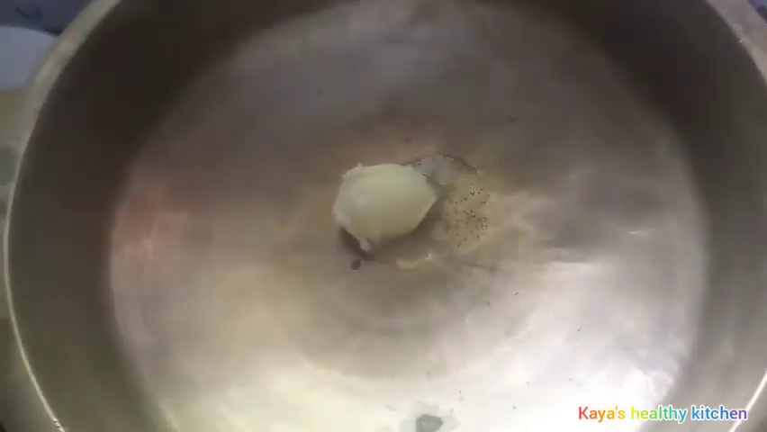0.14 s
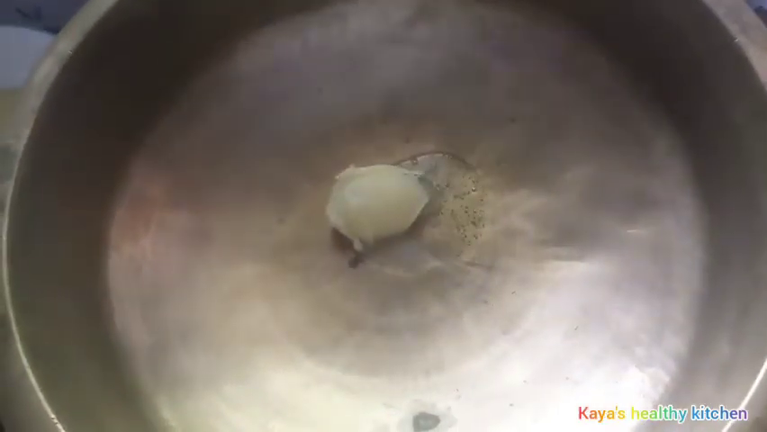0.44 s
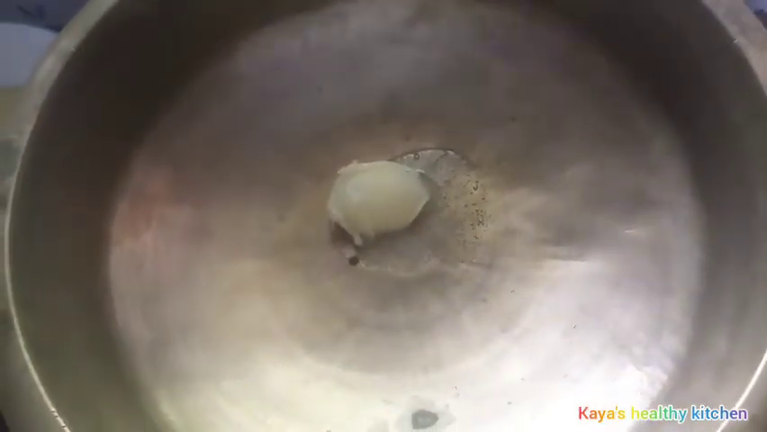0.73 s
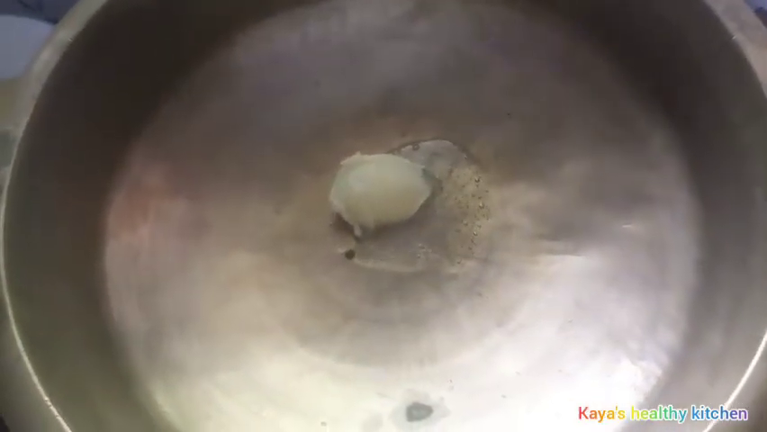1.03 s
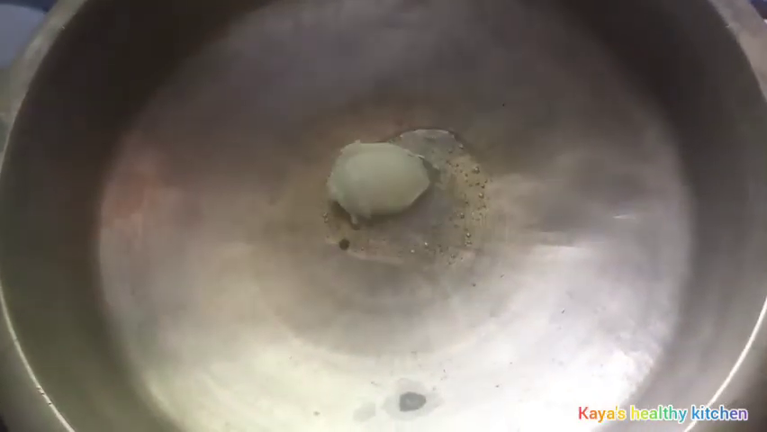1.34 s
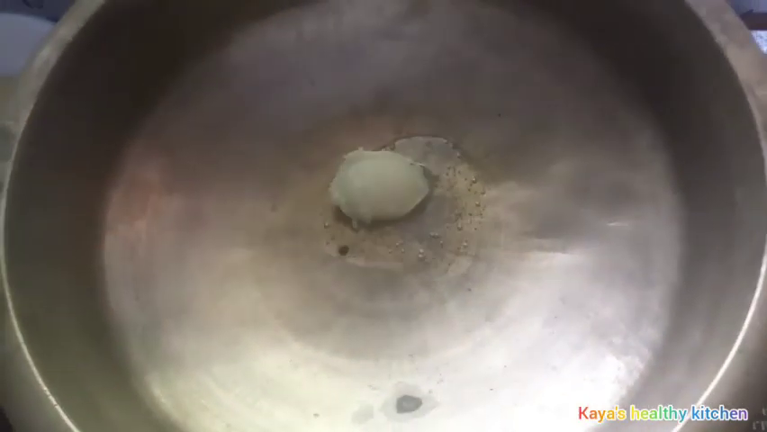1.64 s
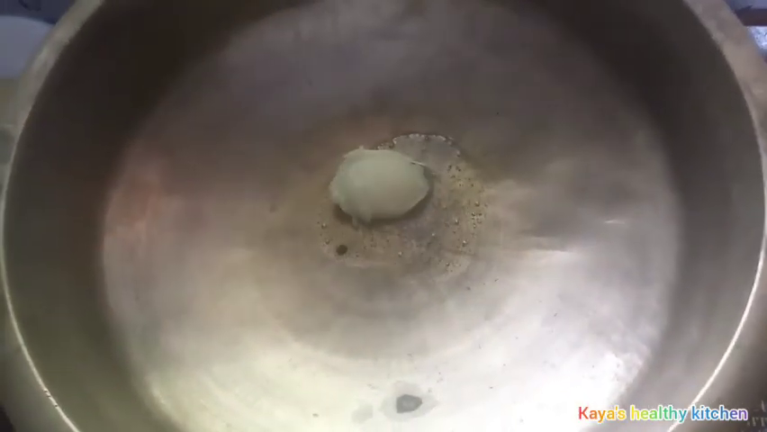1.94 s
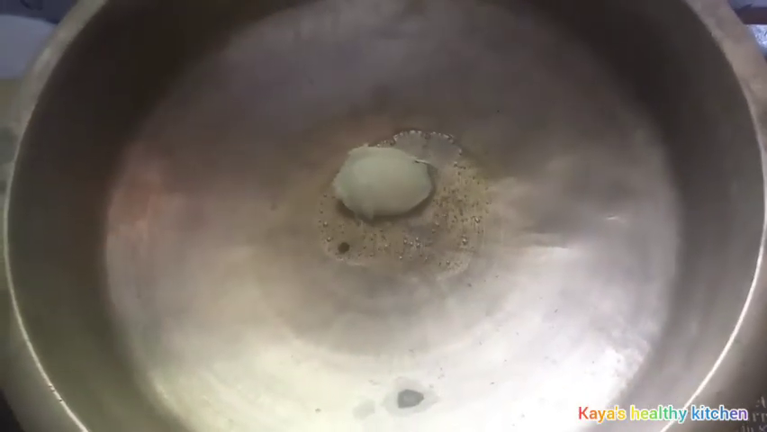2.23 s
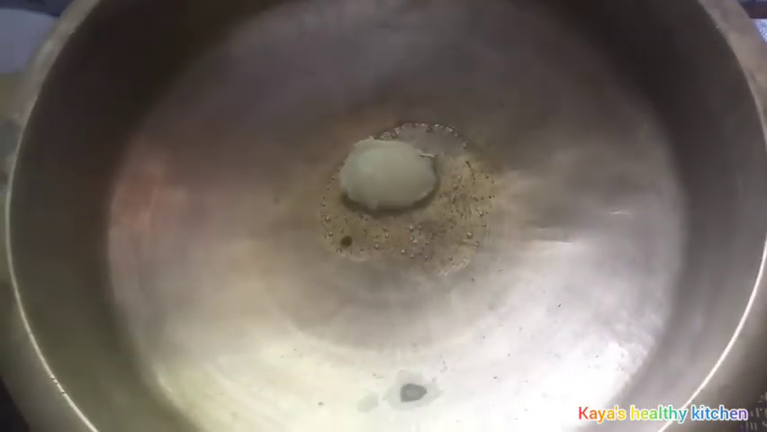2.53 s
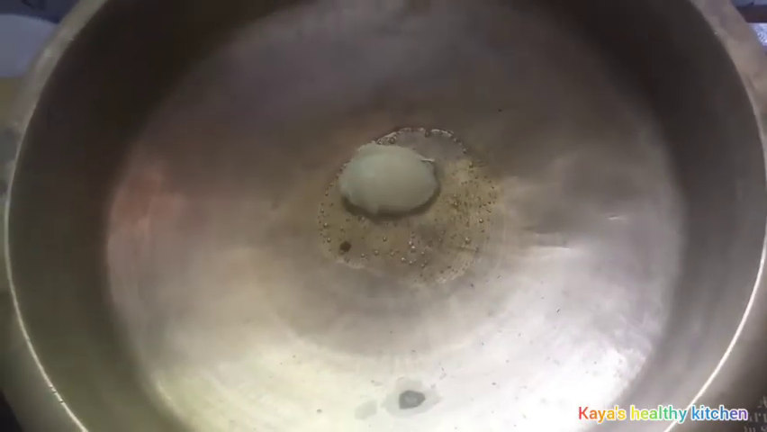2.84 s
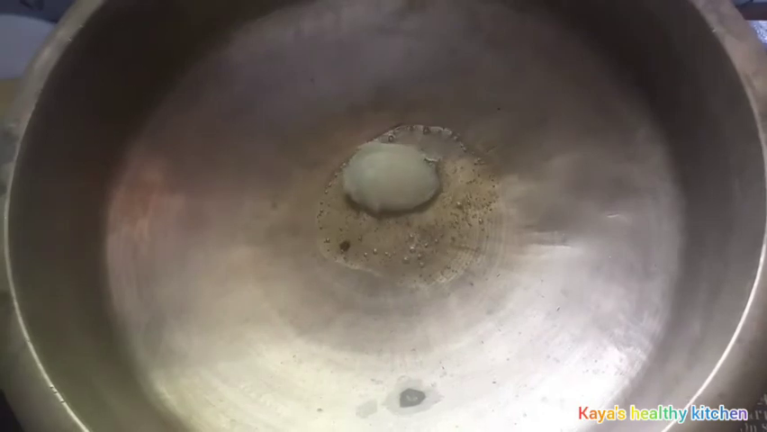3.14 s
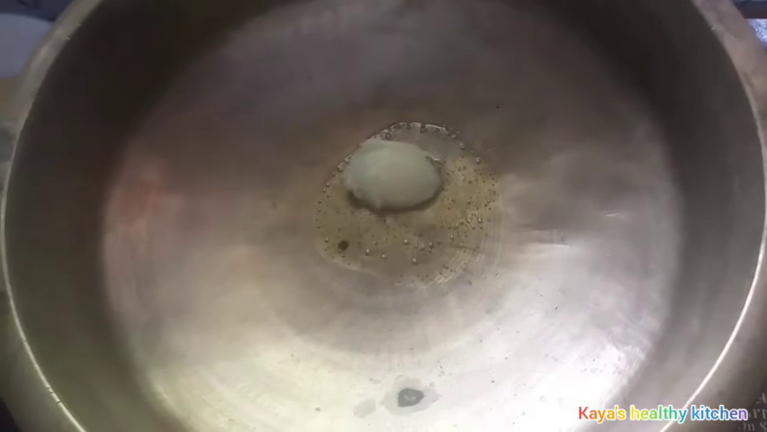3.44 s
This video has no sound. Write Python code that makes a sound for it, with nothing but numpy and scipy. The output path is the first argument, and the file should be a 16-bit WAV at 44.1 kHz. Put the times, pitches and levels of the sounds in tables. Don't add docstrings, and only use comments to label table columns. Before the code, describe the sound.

Butter sizzles in a hot steel pan, close and mono. From 0 to 1.5 seconds a dense bright fizz carries rapid, loud, sharp cracks with short metallic ringing. From 1.6 to 2.1 the sizzle thins and pops separate. Afterwards only faint ticks, spits and small puffs remain, with a few clearer pops near 3.3 and 3.5, over quiet low kitchen tone and faint hiss.

```python
import sys
import numpy as np
from scipy import signal
from scipy.fft import rfft, irfft
from scipy.io import wavfile

SR = 44100
rng = np.random.default_rng(int(sys.argv[2]) if len(sys.argv) > 2 else 0)


def master(y):
    cut = np.clip(np.atleast_2d(y).T, -1, 1)
    pcm = np.round(cut * 32767)
    wavfile.write(sys.argv[1], SR, pcm.astype(np.int16))


def ratio_of_db(decibels):
    return 10 ** (np.asarray(decibels, float) / 20)


N = 158760
TREBLE_HZ = 10500
CRACK_HZ = 4164
POP_LAG_S = 0.001021
BURST_LEN = 1024


def rms_one(x):
    return x / np.sqrt(np.mean(x ** 2) + 1e-20)


def drift(rate):
    r = np.exp(-80 * np.pi * rate / SR)
    slow = signal.lfilter([1], [1, -2 * r, r * r], rng.standard_normal(N // 40 + 2002))[2000:]
    return np.interp(np.arange(N) / 40, np.arange(len(slow)), rms_one(slow))


def ring(clicks, hz, t60):
    r = ratio_of_db(-60 / (t60 * SR))
    w = 2 * np.pi * min(hz, .45 * SR) / SR
    return signal.lfilter([0, np.sin(w)], [1, -2 * r * np.cos(w), r * r], clicks + 1e-18)


def colour(x, points):
    below = (points[0][0] / 4, points[0][1] - 25)
    above = (points[-1][0] * 3, points[-1][1] - 40)
    hz, db = np.transpose([below] + list(points) + [above])
    log_hz = np.log(np.arange(2049) * SR / 4096 + 1)
    ceps = irfft(np.interp(log_hz, np.log(hz), db) * np.log(10) / 20)
    ceps[1:2048] *= 2
    impulse = irfft(np.exp(rfft(ceps[:2049], 4096)))
    return signal.fftconvolve(x, impulse)[:len(x)]


def bubbles(vigour_db, per_s, spread_db, cycles, clump_db, low_hz, high_hz, points):
    rate_share = .4
    sag, sag_from_s, sag_to_s = 0.99, 0.59, 1.6
    swing = rate_share * (vigour_db - vigour_db.max())
    draw = rng.random((3, N))
    excess = np.minimum(-np.log(draw[0] + 1e-9), 2.8)
    sizes = ratio_of_db(spread_db * excess) * rng.choice([-1, 1], N)
    chance = per_s * ratio_of_db(swing + clump_db * (drift(7) + drift(25))) / SR
    born = sizes * (draw[1] < chance)
    group = (draw[2] * 16).astype(int)
    rings = np.zeros(N)
    for k, hz in enumerate(np.geomspace(low_hz, high_hz, 16)):
        rings += ring(born * (group == k), hz, cycles / hz) * hz ** .5
    late = np.clip((np.arange(N) / SR - sag_from_s) / (sag_to_s - sag_from_s), 0, 1)
    sunk = [(hz * sag, db) for hz, db in points]
    toned = (1 - late) * colour(rings, points) + late * colour(rings, sunk)
    return ratio_of_db(vigour_db) * rms_one(toned * ratio_of_db(-swing / 2))


def large_bubbles(big_db):
    # frequency in Hz, density in dB per Hz.
    big_colour = [(1800, -18), (2600, -6.5), (3300, -7.5), (3700, 1.5), (4200, 5), (4700, 0.5), (5100, -12)]
    return ratio_of_db(-2.5) * bubbles(big_db, per_s=700, spread_db=3, cycles=5.6, clump_db=1,
                               low_hz=1460, high_hz=7000, points=big_colour)


def fine_fizz(fizz_db):
    # frequency in Hz, density in dB per Hz.
    fizz_colour = [(2650, -16.5), (4500, -14.5), (4990, -7), (5960, -4.5), (6850, -7.5), (8600, -4.5),
                   (9850, -18), (11300, -13.5), (12800, -20), (14300, -15.5), (15600, -19)]
    dulls_below_db, dulls_db = -31, -2.5
    fizz = ratio_of_db(-0.5) * bubbles(fizz_db, per_s=1300, spread_db=4.5, cycles=3.7, clump_db=1,
                               low_hz=6000, high_hz=11900, points=fizz_colour)
    treble = signal.sosfiltfilt(signal.butter(4, TREBLE_HZ, "high", fs=SR, output="sos"), fizz)
    loss_db = dulls_db * np.clip((dulls_below_db - fizz_db) / 10, 0, 2)
    return fizz - treble * (1 - ratio_of_db(loss_db))


def short_burst(hz, cycles):
    unit = np.eye(1, BURST_LEN)[0]
    first, second = cycles
    burst = ring(ring(unit, hz, first / hz), hz, second / hz)
    return burst / np.abs(burst).max()


def film_crack():
    return short_burst(CRACK_HZ, (4.44, 4.44))


def pops():
    # start in seconds, peak in dB, pitch in Hz.
    early_pops = [(0.118, -7, 4100), (0.154, -0.5, 3830), (0.186, -2.5, 3940), (0.2265, -1, 4120),
                  (0.2593, -5.5, 4350), (0.3164, -29, 4330), (0.387, -12, 4400), (0.4627, -2.5, 4000),
                  (0.6187, -3.5, 4130), (0.645, -5, 4250), (0.6981, 0.5, 4270), (0.7199, -0.5, 3770),
                  (0.7697, -7.5, 4320), (0.8134, -1.5, 4200), (0.8402, -2, 4200), (0.9302, -4, 4150),
                  (0.9446, -1, 4060), (0.988, -8.5, 3900), (1.0133, 2, 4330), (1.1413, -9, 3700),
                  (1.1564, -3, 3830), (1.2126, -2.5, 4130), (1.2218, -7, 3900), (1.2468, -9, 4160),
                  (1.2985, -3, 3940), (1.3265, -3, 3700), (1.3812, -4.5, 3850), (1.3922, -4, 4350),
                  (1.4153, -13, 3800), (1.4481, -4.5, 3870), (1.4618, -5.5, 4070), (1.504, -6, 3620),
                  (1.5252, -6.5, 4480), (1.55, -3, 3850)]
    # start in seconds, peak in dB, pitch in Hz,
    # tail in dB.
    lone_pops = [(1.6211, -2, 3970, -0.5), (1.6939, 0, 3840, -21), (1.73, -10.5, 4100, 1),
                 (1.7622, -8, 4680, 2.5), (1.7854, -3, 4180, -1), (1.918, -3.5, 4600, -8),
                 (1.977, -20, 7200, 6), (2.0023, -16, 6600, 9), (2.012, -7.5, 4360, -1.5),
                 (2.0849, -20, 4760, 8.5), (2.1223, -12.5, 4660, 4.5), (2.2386, -22, 6340, -3),
                 (2.2494, -21.5, 7140, -16), (2.2819, -18, 4660, 5), (2.308, -22, 5840, 2),
                 (2.3506, -16.5, 5240, -0.5), (2.4064, -23.5, 4980, 8), (2.5202, -16, 3670, -14),
                 (2.5455, -22, 4600, -32),
                 (2.6484, -19, 5030, 3), (2.664, -28, 4860, -6), (2.7219, -23, 5660, 5),
                 (2.7833, -20, 5800, -4), (2.8256, -24.5, 6170, -6), (2.8522, -17.5, 4570, 0.7),
                 (2.864, -31, 8100, 1.7), (2.8758, -28, 7900, 1.7), (2.9528, -34, 7200, 8),
                 (2.9872, -25, 6900, 1.2), (3.018, -36, 8200, -1), (3.0615, -28, 7000, 4.5),
                 (3.2032, -35.5, 5860, 11), (3.2384, -34.5, 5600, 1.5), (3.3369, -13, 5320, 1.3),
                 (3.3702, -19, 5030, 1), (3.5248, -17.5, 4700, -5.8)]
    early_tail_db, pop_db, wet_db, ring_db, ring_cycles = 3.5, 0.5, -3.5, -12, 38
    dry, send = np.zeros(N + BURST_LEN), np.zeros(N + BURST_LEN)
    unit = np.eye(1, BURST_LEN)[0]
    crack = film_crack()
    for s, db, hz, tail_db in [row + (early_tail_db,) for row in early_pops] + lone_pops:
        bubble = ring(unit, hz, ring_cycles / hz)
        i = int((s + POP_LAG_S) * SR)
        part = slice(i, i + BURST_LEN)
        lift = np.clip(hz / CRACK_HZ, .5, 2) ** 2
        dry[part] += ratio_of_db(db + pop_db) * (crack + ratio_of_db(ring_db) * np.roll(bubble, 4) * lift)
        send[part] += ratio_of_db(db + pop_db + wet_db + tail_db) * (bubble + 0.1 * crack)
    return dry[:N], send[:N]


def spits_and_puffs():
    # start in seconds, peak in dB, pitch in Hz.
    spits = [(1.7742, -21, 13900), (1.824, -25, 11700), (2.0126, -31, 11400), (2.0745, -35, 11300),
             (2.1902, -38, 14500), (2.248, -29, 11400), (2.352, -30, 11500), (2.3638, -27, 14500),
             (2.4985, -39, 10600), (2.52, -26, 11300), (2.5574, -36, 11400), (2.6237, -31.5, 11300),
             (2.6492, -36, 14300), (2.7165, -30, 11200), (2.7529, -43, 10500), (2.7819, -42, 11200),
             (2.8532, -45, 10650), (3.0193, -49, 10600), (3.0602, -43, 11100), (3.1061, -41, 15000),
             (3.2396, -27.5, 11600), (3.3187, -31, 14200), (3.37, -30.5, 11600), (3.482, -39, 11400),
             (3.5796, -41, 14300)]
    # start in seconds, peak in dB, pitch in Hz, tail in dB.
    puffs = [(1.9323, -16.5, 7300, -1), (2.1842, -21, 6100, -5), (2.2391, -20.5, 6500, 3),
             (2.3039, -25, 5950, 0), (2.3164, -22, 8010, 2), (2.3523, -22.5, 6800, -7),
             (2.4341, -24, 6560, 1), (2.5209, -26.5, 8300, -2), (2.5514, -27, 6530, -3.5),
             (2.5628, -27.5, 8000, 0), (2.5883, -23.5, 8150, 1), (2.6476, -32, 7410, 4),
             (2.7, -37, 7660, 5), (2.7215, -30.5, 7700, 3.5), (2.7514, -26, 8650, -2),
             (2.7823, -28.5, 6260, 1), (2.8267, -25.5, 5840, -2), (2.8532, -21, 6900, -3),
             (2.8766, -19, 7960, -2.5), (2.9529, -27.5, 7200, -11), (2.9884, -25, 7500, -15),
             (3.0198, -24.5, 8200, -3), (3.0667, -24.5, 7340, 0), (3.2029, -27.5, 5800, -7),
             (3.3376, -24, 5940, -7), (3.371, -27.5, 7600, -4), (3.4807, -33.5, 9500, 3),
             (3.5047, -33.5, 7760, 0), (3.5825, -27, 8200, 2)]
    spit_db, spit_cycles, spit_wet_db = -1, 17, -7
    puff_db, puff_cycles, puff_wet_db = 1.9, 18, 2
    bursts = [(s, db + spit_db, hz, spit_wet_db, spit_cycles) for s, db, hz in spits]
    bursts += [(s, db + puff_db, hz, tail_db + puff_wet_db, puff_cycles) for s, db, hz, tail_db in puffs]
    dry, send = np.zeros(N + BURST_LEN), np.zeros(N + BURST_LEN)
    for s, db, hz, tail_db, cycles in bursts:
        i = int((s + POP_LAG_S) * SR)
        burst = ratio_of_db(db) * short_burst(hz, (cycles, cycles / 2))
        dry[i:i + BURST_LEN] += burst
        send[i:i + BURST_LEN] += ratio_of_db(tail_db) * burst
    return dry[:N], send[:N]


def crackle(big_db):
    # start in seconds, peak in dB.
    ticks = [(2.208, -28), (2.2124, -25), (2.221, -29), (2.2536, -13), (2.2743, -16), (2.3154, -22),
             (2.3296, -18), (2.3644, -18), (2.38, -22), (2.4218, -15), (2.4336, -17), (2.4442, -31),
             (2.452, -21), (2.5514, -23), (2.7173, -27), (2.7275, -16), (2.9004, -26), (3.0666, -16.5),
             (3.4814, -29)]
    per_s, crackle_db, end_s, tick_db = 70, 13, 2.2, -6.5
    small = (rng.random(N) < per_s / SR) * ratio_of_db(big_db + crackle_db + 2.0 * rng.standard_normal(N))
    small = small * (np.arange(N) / SR < end_s)
    for s, db in ticks:
        small[int((s + POP_LAG_S) * SR)] = ratio_of_db(db + tick_db)
    return signal.fftconvolve(small, film_crack())[:N]


def single_bursts(big_db):
    # frequency in Hz, gain in dB.
    mic_colour = [(2000, 1), (5000, 0), (9000, -4), (10000, -14), (15500, -20)]
    pop_dry, pop_send = pops()
    spit_dry, spit_send = spits_and_puffs()
    dry = colour(pop_dry + crackle(big_db), mic_colour) + spit_dry
    return dry, colour(pop_send, mic_colour) + spit_send


def pan_body(big_db, dry):
    # frequency in Hz, density in dB per Hz.
    body_colour = [(500, -14), (620, -1), (800, -7.5), (1000, -5), (1040, -16), (1120, 1), (1330, 0),
                   (1440, 5), (1550, -0.5), (1750, -2.5)]
    body_db, follows, fade_db_per_s, thud_db = -26, 0.6, 4, -25
    peak_db = big_db.max()
    swell_db = body_db + peak_db + follows * (big_db - peak_db)
    swell_db = swell_db - fade_db_per_s * np.arange(N) / SR + 2.0 * drift(30)
    body = ratio_of_db(swell_db) * rms_one(colour(rng.standard_normal(N), body_colour))
    return body + ratio_of_db(thud_db) * colour(np.abs(dry), body_colour)


def echoed(x):
    # delay in seconds, level in dB.
    echoes = [
        (.0019, -5),
        (.0042, -14),
    ]
    thin = signal.sosfilt(signal.butter(2, 3600, "high", fs=SR, output="sos"), x)
    return x + sum(ratio_of_db(db) * np.pad(thin, (int(s * SR), 0))[:len(x)] for s, db in echoes)


def space(pan_db):
    # frequency in Hz, level in dB, t60 in seconds.
    pan_modes = [(2350, -10, .3), (3600, -6, .2), (4140, -5, .2), (4770, -1, .7), (5110, 1, .35),
                 (5400, -3, .3), (5760, -2, .3), (7550, -3, .3), (8400, 0, .35), (10450, -3, .7)]
    kitchen_t60_s, treble_t60_s, rise_s = 0.26, 0.2, 0.0037
    t = np.arange(SR // 2) / SR
    noise = rng.standard_normal(len(t))
    low = signal.sosfiltfilt(signal.butter(2, TREBLE_HZ, fs=SR, output="sos"), noise)
    tail = low * ratio_of_db(-60 * t / kitchen_t60_s) + (noise - low) * ratio_of_db(-60 * t / treble_t60_s)
    tail = rms_one(tail * (1 - np.exp(-t / rise_s)))
    steel = sum(ratio_of_db(db - 60 * t / t60) * np.sin(2 * np.pi * hz * t) for hz, db, t60 in pan_modes)
    return rms_one(tail + ratio_of_db(pan_db) * rms_one(steel)) / np.sqrt(len(t))


def pan_and_kitchen(big, fizz, send):
    wall_s, wall_db = .0165, -9
    spread = ratio_of_db(-4.5) * big + ratio_of_db(-1) * fizz
    wet = np.zeros(N)
    for path in range(4):
        wet += 0.98 * signal.fftconvolve(spread * np.tanh(drift(20.7)), space(pan_db=-15))[:N]
    wet += signal.fftconvolve(send, space(pan_db=-10))[:N]
    return wet + ratio_of_db(wall_db) * np.pad(send, (int(wall_s * SR), 0))[:N]


def room_tone():
    # frequency in Hz, density in dB per Hz.
    room_colour = [(25, -28), (65, -5), (115, -5.5), (230, -17), (1100, -42), (1400, -7), (2000, -15)]
    # time in seconds, level in dB.
    rumble = [
        (0, -56),
        (1.1, -66.5),
        (1.5, -65.5),
        (3.05, -65),
        (3.4, -59),
    ]
    rumble_db = np.interp(np.arange(N) / SR, *np.transpose(rumble)) + drift(10)
    return ratio_of_db(rumble_db) * rms_one(colour(rng.standard_normal(N), room_colour))


def far_hiss():
    hiss_hz, t60_s, hiss_db = 2534, 0.0047, -58.5
    hiss = ring(ring(rng.standard_normal(N), hiss_hz, t60_s), hiss_hz, t60_s)
    return rms_one(hiss) * ratio_of_db(hiss_db + 2.0 * drift(9))


def far_hum():
    # centre in seconds, length in seconds, level in dB.
    swells = [
        (2.71, 0.042, -72),
        (2.905, 0.065, -72),
        (3.06, 0.042, -62.5),
    ]
    t = np.arange(N) / SR
    swell = sum(ratio_of_db(db) * np.exp(-((t - s) / length) ** 2 * 2) for s, length, db in swells)
    return np.sin(2 * np.pi * 764 * t) * swell


def far_knock():
    # start in seconds, level in dB.
    strike = (2.481, -32)
    # frequency in Hz, level in dB, t60 in seconds.
    knock_modes = [(600, -26, .2), (1700, -9, .05), (1950, -8, .03), (2200, -2, .03), (2400, 0, .045)]
    start_s, strike_db = strike
    since = np.maximum(np.arange(N) / SR - start_s, 0)
    knock = sum(ratio_of_db(strike_db + db - 60 * since / t60) * np.sin(2 * np.pi * hz * since)
                for hz, db, t60 in knock_modes)
    return knock * (1 - np.exp(-since / .003))


def scene():
    # time in seconds, large bubbles in dB, fine fizz in dB.
    boil = [(0, -23, -26.5), (0.119, -18, -27), (.42, -16.5, -23), (.55, -20, -25), (0.752, -18.5, -26),
            (1.298, -22.5, -28.5), (1.798, -27, -32), (2.05, -39, -38), (2.25, -45, -45),
            (2.449, -46.5, -43), (2.52, -46.5, -52.5), (2.8, -55, -47.5), (3.05, -46, -46.5),
            (3.18, -83, -56), (3.4, -54, -51), (3.6, -49, -52.5)]
    s, big_points, fizz_points = np.transpose(boil)
    t = np.arange(N) / SR
    big_db, fizz_db = np.interp(t, s, big_points), np.interp(t, s, fizz_points)
    big = large_bubbles(big_db)
    fizz = fine_fizz(fizz_db)
    dry, send = single_bursts(big_db)
    ceiling = 2.2
    close = echoed(big + fizz + dry) + pan_and_kitchen(big, fizz, send)
    close = ceiling * np.tanh(close / ceiling)
    mic_cut = signal.cheby1(9, 1, 1822, "high", fs=SR, output="sos")
    close = signal.sosfilt(mic_cut, close)
    background = room_tone() + far_hiss() + far_hum() + far_knock()
    mix = close + pan_body(big_db, dry) + background
    return np.tile(mix, (2, 1))


def top_cut(x):
    return signal.sosfilt(signal.butter(12, 15700, fs=SR, output="sos"), x)


def record(dry):
    clipped = np.clip(dry, -.93, .93)
    return top_cut(clipped)


dry = scene()
out = record(dry)
master(out)
```